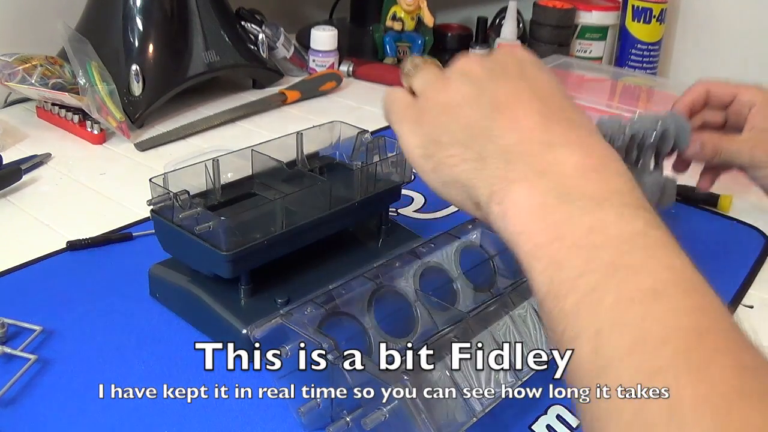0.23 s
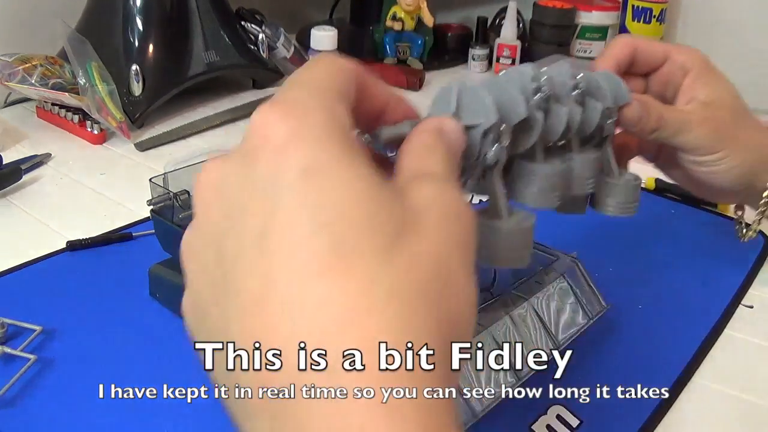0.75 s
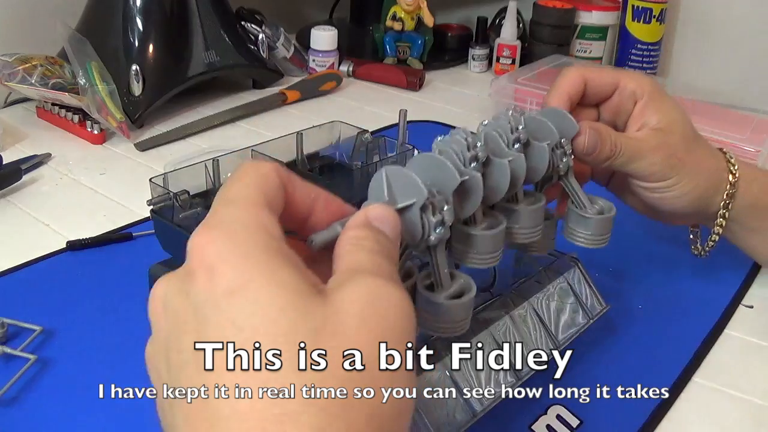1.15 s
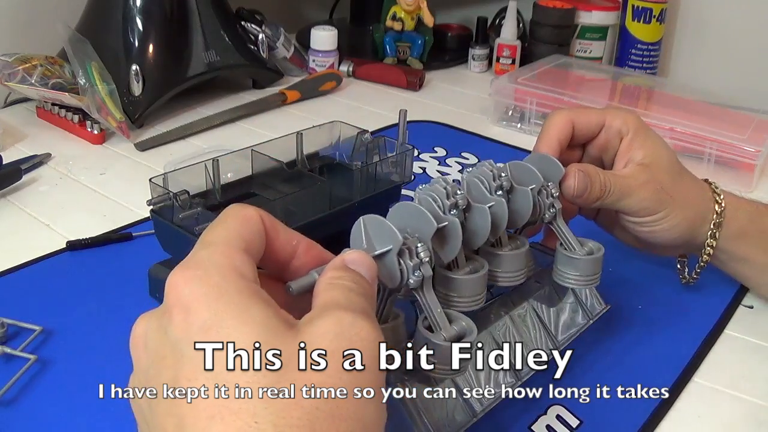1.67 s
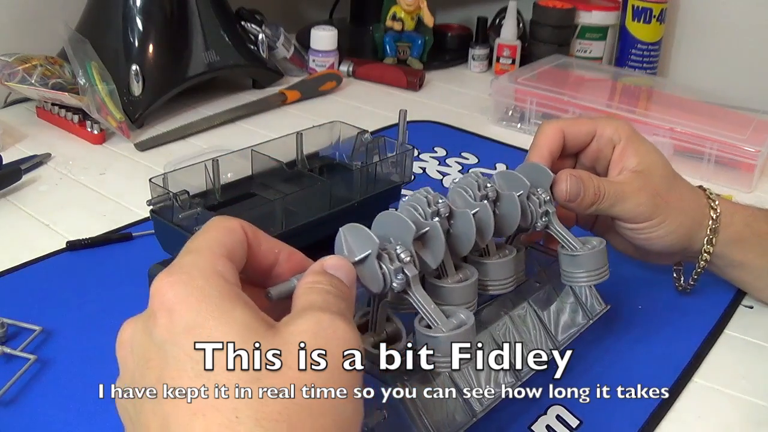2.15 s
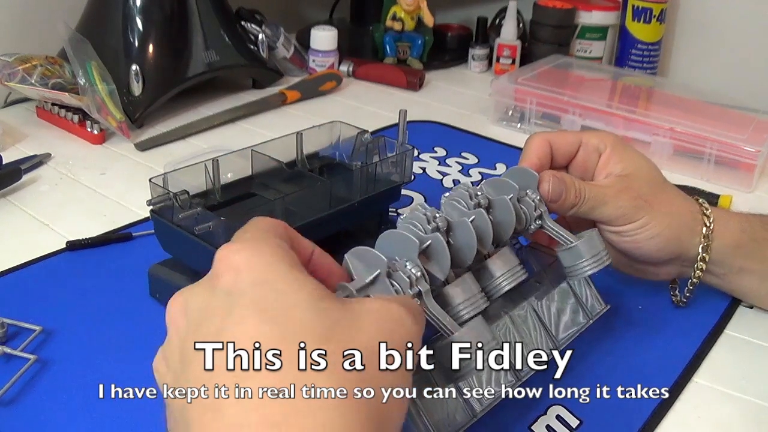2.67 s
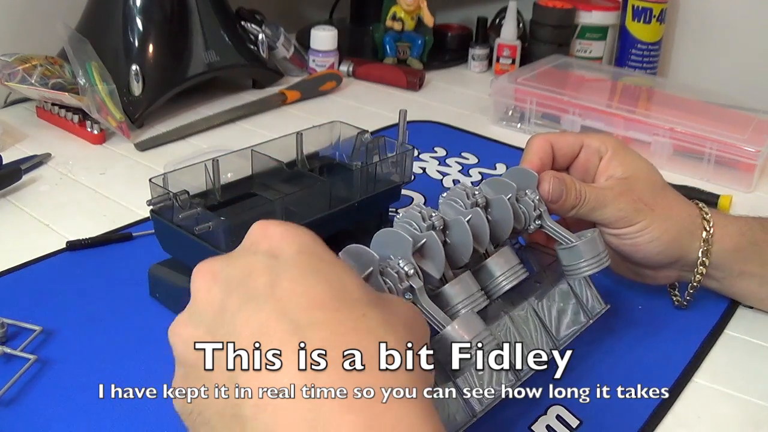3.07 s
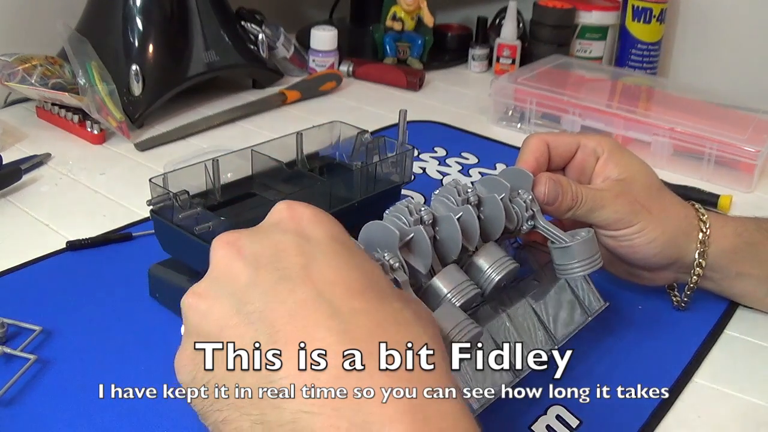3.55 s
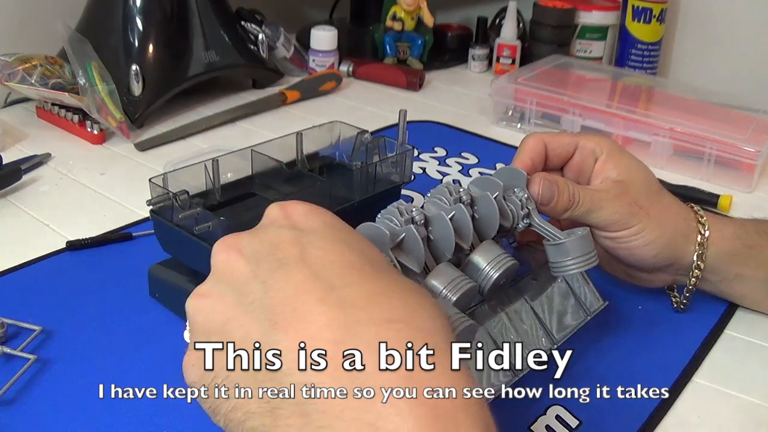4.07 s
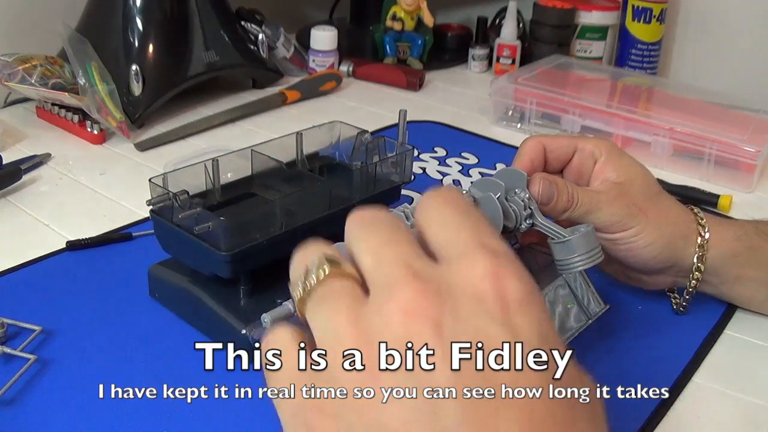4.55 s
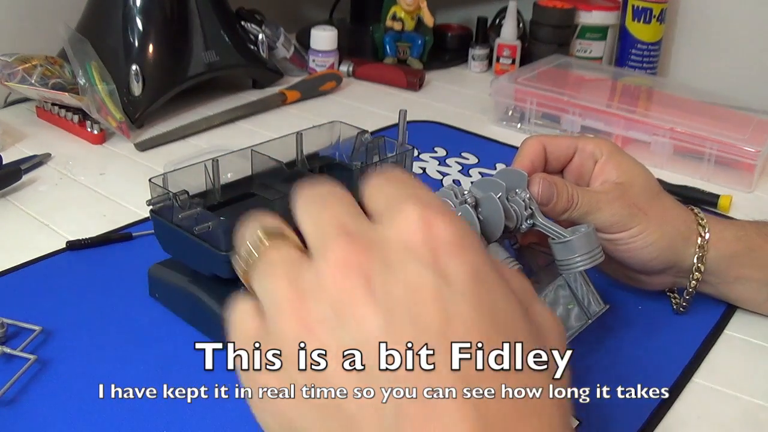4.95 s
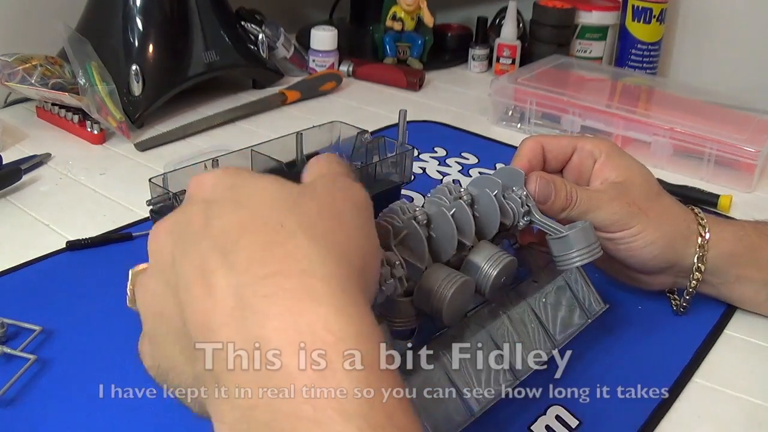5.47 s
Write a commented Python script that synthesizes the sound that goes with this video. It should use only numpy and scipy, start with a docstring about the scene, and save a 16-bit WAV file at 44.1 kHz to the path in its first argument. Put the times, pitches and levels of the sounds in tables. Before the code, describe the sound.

Small hard plastic parts clatter in a quick burst, then click, scrape and knock against a hollow plastic shell in a small quiet room.

```python
"""Crankshaft lowered into a hollow block

Hands lower a plastic crankshaft with dangling pistons into a hollow plastic engine block on a desk.
Each contact cracks, bounces, rings the small parts and knocks the block, from dying sines and noise bursts.
Sliding and rattling are clumps of tiny touches; the desk rumbles under the hands as resonant noise.
A small room answers with sparse reflections, and shaped noise makes the microphone hiss underneath.
"""
import sys
import numpy as np
from scipy import signal
from scipy.fft import rfft, irfft
from scipy.io import wavfile
from scipy.ndimage import uniform_filter1d

SR = 44100
rng = np.random.default_rng(int(sys.argv[2]) if len(sys.argv) > 2 else 0)


def dump(signal):
    """Clip the signal to [-1, 1] and save it as 16-bit WAV at the path in sys.argv[1]."""
    limited = np.clip(np.atleast_2d(signal).T, -1, 1)
    pcm = np.round(limited * 32767).astype(np.int16)
    wavfile.write(sys.argv[1], SR, pcm)


N = 252252  # length in samples

# Contacts, before left-right placement and room:
# start_s, small_parts_peak_db, block_rms_db, struck_part_pitch_hz, chatter_t60_s
CONTACTS = [(0.0421, -34.5, -81, 2760, 0.28), (0.059, -26, -77, 4200, 0.29), (0.0998, -11, -64, 7230, 0.14),
            (0.1067, -15, -71, 7240, 0.079), (0.1096, -16, -46.5, 3920, 0.19),
            (0.1237, -12.5, -51, 6100, 0.092), (0.144, -18.5, -51, 4240, 0.072),
            (0.1674, -6.5, -41.5, 7560, 0.03), (0.1732, -7.5, -45, 6960, 0.54),
            (0.1766, -11, -71, 3770, 0.22), (0.2016, -15, -64, 3410, 0.25), (0.2436, -14, -49, 7600, 0.066),
            (0.2805, -23.5, -74, 3530, 0.071), (0.383, -25, -93, 5900, 0.21),
            (0.7474, -34.5, -69, 8200, 0.099), (1.0564, -42.5, -85, 6120, 0.048),
            (1.1184, -38, -71, 5240, 0.048), (1.2192, -42.5, -71, 5520, 0.055),
            (1.3587, -41, -49, 4270, 0.036), (1.3589, -14, -33.5, 2520, 0.092),
            (1.4093, -15.5, -29, 2020, 0.17), (1.492, -16.5, -36, 4880, 0.12),
            (1.524, -22.5, -41.5, 2150, 0.1), (1.5655, -29.5, -44, 7820, 0.12),
            (1.5969, -35.5, -51.5, 2750, 0.035), (1.618, -33.5, -74, 2940, 0.073),
            (1.6464, -35, -71, 2950, 0.015), (1.6645, -43, -70, 2750, 0.047),
            (1.671, -58, -44.5, 2000, 0.037), (1.733, -47.5, -82, 2750, 0.026),
            (1.807, -46, -65, 2930, 0.03), (1.818, -37.5, -50.5, 2780, 0.054),
            (1.8442, -54, -46, 2700, 0.15), (1.8917, -48, -51, 2940, 0.06),
            (1.9496, -33.5, -35, 4000, 0.077), (1.959, -19, -36.5, 4110, 0.074),
            (1.9842, -30, -58, 3160, 0.046), (2.021, -35.5, -42, 2240, 0.12), (2.08, -37, -61, 3690, 0.13),
            (2.0912, -49, -41, 2280, 0.016), (2.1277, -32.5, -73, 3400, 0.027),
            (2.2434, -28.5, -43.5, 1996, 0.078), (2.2964, -30, -46, 3030, 0.38),
            (2.3169, -23, -28.5, 4500, 0.36), (2.3275, -17.5, -36.5, 9030, 0.05),
            (2.3836, -32, -37.5, 2100, 0.052), (2.4161, -54, -37.5, 2190, 0.055),
            (2.4665, -16.5, -23.5, 4450, 0.21), (2.4793, -7.5, -20.5, 2080, 0.095),
            (2.5038, -10.5, -20.5, 6780, 0.099), (2.526, -41, -32, 2100, 0.05),
            (2.5348, -15, -21.5, 6000, 0.024), (2.5475, -23.5, -22, 2160, 0.022),
            (2.559, -22.5, -40.5, 4420, 0.03), (2.572, -42, -52, 2100, 0.039),
            (2.589, -34, -53, 5730, 0.036), (2.615, -31.5, -59, 5400, 0.085), (2.666, -26, -44, 4180, 0.39),
            (2.682, -26.5, -35.5, 5240, 0.31), (2.698, -17.5, -35.5, 6240, 0.036),
            (2.805, -26, -35.5, 4800, 0.1), (2.818, -20.5, -36, 3250, 0.16),
            (3.096, -42.5, -56, 4100, 0.05), (3.1256, -51, -55.5, 4650, 0.24),
            (3.216, -39, -53, 3680, 0.038), (3.2381, -26.5, -44.5, 4860, 0.056),
            (3.3071, -42, -42.5, 2580, 0.11), (3.323, -41, -43, 2600, 0.24), (3.7, -45, -52.5, 3000, 0.35),
            (3.7661, -42.5, -47.5, 2250, 0.26), (4.0028, -43.5, -46.5, 2650, 0.25),
            (4.024, -30.5, -44.5, 5630, 0.096), (4.1291, -26, -34, 4450, 0.41),
            (4.1491, -9, -28, 2170, 0.067), (4.1525, -10, -61, 4280, 0.033),
            (4.2108, -26.5, -51, 5050, 0.085), (4.3002, -42.5, -47.5, 4470, 0.077),
            (4.8345, -35, -66, 6200, 0.032), (4.8406, -32.5, -54.5, 2860, 0.067),
            (4.977, -51, -51.5, 2060, 0.11), (5.0357, -33.5, -57, 2530, 0.16),
            (5.101, -31, -58, 2600, 0.068), (5.1438, -37, -51, 4360, 0.43), (5.186, -23, -42, 4700, 0.084),
            (5.2312, -43, -44, 2660, 0.1), (5.308, -48.5, -47.5, 3270, 0.15),
            (5.3709, -31, -45.5, 2720, 0.015), (5.3816, -21, -40.5, 2140, 0.028),
            (5.5776, -29.5, -65, 3110, 0.52), (5.592, -24.5, -55, 8360, 0.058),
            (5.654, -7.5, -20, 2010, 0.15), (5.6631, -11, -24.5, 5940, 0.16),
            (5.6762, -13.5, -31.5, 2150, 0.33), (5.6916, -19, -30.5, 2170, 0.17)]
# Modes of the hollow block: pitch_hz, level_db
BLOCK_MODES = [(850, -1), (980, -2), (1180, -4), (1260, -7), (1375, -7), (1435, -7.5), (1600, -8),
               (1700, -5), (1950, 0), (2170, -26.5)]
# Modes of pistons, rods and shaft: pitch_hz, t60_s
PART_MODES = [(2170, .03), (2450, .022), (2750, .022), (2950, .018), (3530, .022), (3880, .025),
              (4450, .025), (5240, .035), (5700, .028), (6100, .02), (6480, .035), (6780, .025),
              (7300, .025), (8050, .03), (8800, .02), (9600, .02)]
# Desk resonances: pitch_hz, width_hz, level_db
DESK_MODES = [(76.8, 14, -5), (136, 12.7, 0), (203.3, 18, -1), (303, 110, -5.5), (534, 530, -11)]
# Decay of the room's reflections: frequency_hz, t60_s
ROOM_DECAY = [(300, 0.18), (1400, 0.27), (4000, 0.16), (10000, 0.15)]
# Relative spectrum of the hiss: frequency_hz, density_db (per Hz)
HISS_SPECTRUM = [(15, -5.5), (25, -0.5), (181, 0), (342, -1), (732, 0), (1160, -4), (1350, -4),
                 (1970, -5.5), (10800, -11.5)]
# Left-right likeness of the hiss: frequency_hz, likeness (0 to 1)
HISS_LIKENESS = [(100, 1), (300, 0.09), (1000, 0.087), (8000, 0.48)]
# Handling: time_s, sliding_level_db, loose_part_rattle_level_db
HANDLING = [(0.0, -50.5, -50.5), (0.13, -53.5, -29), (0.25, -71, -30.5), (0.41, -62, -63.5),
            (0.94, -71.5, -64.5), (1.4, -104, -68.5), (1.531, -49.5, -52), (1.64, -63.5, -66),
            (1.86, -79, -68.5), (2.02, -50.5, -66), (2.31, -55.5, -49), (2.45, -35.5, -40),
            (2.53, -52, -29), (2.69, -41, -67), (2.869, -65, -61), (3.582, -66.5, -70.5),
            (4.031, -67.5, -68.5), (4.169, -41, -36.5), (4.38, -76, -66), (4.801, -73, -75),
            (5.24, -51.5, -61.5), (5.42, -67.5, -54), (5.62, -53, -81), (5.72, -57, -30)]
# Pitch of the spot struck on the block wall: time_s, pitch_hz
WALL_PITCH = [(5.15, 1400), (5.25, 1190), (5.45, 1190), (5.6, 1400)]

HISS_DB = -59.5  # rms before the band limit
EDGE_HZ = 11100  # top of the sound
BLOCK_T60_S = 0.048
RUMBLE_OFFSET_DB, RUMBLE_FOLLOWS = -38, 0.45  # rumble level = offset + this share of the sliding level
BOUNCES_PER_S, BOUNCE_DB = 450, -7.5  # base level of a bounce against the first touch
WALL_PITCH_SPREAD = 0.025  # standard deviation, in log pitch
SLIPS_PER_S, TICKS_PER_S = 340, 250
CLUMP_S, CLUMP_DB = 0.017, 6.5  # smoothing time and swing of the clumped touches
PLACE_DB = 1.1  # random left-right tilt, up one side and down the other


def gain_of(db):
    """Turns decibels into amplitude."""
    return 10 ** (np.asarray(db) / 20)


def read(points, hz):
    """Reads a table on a log-frequency axis."""
    f, value = np.transpose(points)
    return np.interp(np.log(hz + 1), np.log(f + 1), value)


def add(mix, s, sound):
    """Mixes a sound in at a time, cut off at the end of the scene."""
    part = mix[:, round(s * SR):][:, :sound.shape[-1]]
    part += sound[..., :part.shape[1]]


def hiss():
    """Shaped noise for room rumble and microphone hiss; likeness between channels varies with frequency."""
    hz = np.fft.rfftfreq(N, 1 / SR)
    left, other = rfft(rng.standard_normal((2, N)))
    alike = np.clip(read(HISS_LIKENESS, hz), 0, 1)
    right = alike * left + np.sqrt(1 - alike ** 2) * other
    noise = irfft(np.array([left, right]) * gain_of(read(HISS_SPECTRUM, hz)), N)
    return gain_of(HISS_DB) * noise / noise.std()


def clumps():
    """Slow random swings, limited both ways, that gather handling noise into clumps."""
    width = int(CLUMP_S * SR)
    swing = uniform_filter1d(uniform_filter1d(rng.standard_normal(N), width), width)
    return np.clip(swing / swing.std(), -1.3, 1.3)


def handling_level(column):
    """Level of one handling column in dB, gliding between its points."""
    table = np.transpose(HANDLING)
    return np.interp(np.arange(N) / SR, table[0], table[column])


def desk_rumble():
    """Fingers shake the desk: noise excites its resonances, swelling with the sliding level."""
    hz = np.fft.rfftfreq(N, 1 / SR)
    desk = sum(gain_of(db) / (1 + (2 * (hz - f) / width) ** 2) for f, width, db in DESK_MODES)
    rumble = irfft(rfft(rng.standard_normal((2, N))) * desk, N) * gain_of(2.3 * clumps())
    rumble[1] = 1.1 * rumble[0] + 0.27 * rumble[1]  # right channel mostly shares the left
    return gain_of(RUMBLE_OFFSET_DB + RUMBLE_FOLLOWS * handling_level(1)) * rumble / rumble.std()


def taps(per_s, spread_db):
    """Tiny touches at random moments, a few of them large."""
    happens = rng.random(N) < per_s / SR
    size = np.minimum(rng.exponential(1, N), 4)
    return happens * gain_of(spread_db * size) * rng.choice([-1, 1], N)


def nearness_db(modes_hz, struck_hz, slope_db, floor_db):
    """Modes near the pitch of the spot struck take most of the blow (slope per octave)."""
    return -np.minimum(slope_db * abs(np.log2(modes_hz / struck_hz)), floor_db)


def ring(hz, db, t60, t, spread_db, detune):
    """Dying sines; where the blow lands changes their strength, sign and, a little, pitch. Peak 1."""
    strength, sign, bend = rng.standard_normal((3, len(hz), 1))
    level_db = db + spread_db * strength - 60 * t / np.maximum(t60, .005)
    sines = np.sin(2 * np.pi * hz * (1 + detune * bend) * t)
    sound = (np.sign(sign) * gain_of(level_db) * sines).sum(0)
    return sound / abs(sound).max()


def band(x, lo_hz, hi_hz):
    """Band-pass, applied twice for steeper sides."""
    sos = signal.butter(2, [lo_hz, min(hi_hz, .45 * SR)], "bandpass", fs=SR, output="sos")
    return signal.sosfilt(np.vstack([sos, sos]), x)


def crack(t, t60, lo_hz, hi_hz):
    """Dying noise for the many short modes of plastic, too dense to tell apart. Peak 1."""
    sound = band(rng.standard_normal(len(t)) * gain_of(-60 * t / t60), lo_hz, hi_hz)
    return sound / abs(sound).max()


def block_slide():
    """Parts drag over the block in tiny slips, each ringing one of five spots on its wall."""
    block_hz, block_db = np.transpose(BLOCK_MODES)[:, :, None]
    t, slide = np.arange(SR // 16) / SR, np.zeros(N)
    slips = taps(SLIPS_PER_S, 2.1) * gain_of(CLUMP_DB * clumps())
    spot = rng.integers(0, 5, N)
    for k in np.unique(spot):
        modes_db = block_db + nearness_db(block_hz, WALL_PITCH[0][1], 12, 1.1)
        shell = ring(block_hz, modes_db, BLOCK_T60_S, t, 1.8, 0.03)
        shell += crack(t, 0.034, 830, 4100)
        slide += signal.oaconvolve(slips * (spot == k), shell)[:N]
    return gain_of(handling_level(1)) * slide / slide.std()


def piston_rattle():
    """Dangling pistons rattle: each random tick rings one part's mode and cracks briefly."""
    t, rattle = np.arange(SR // 16) / SR, np.zeros(N)
    ticks = taps(TICKS_PER_S, 2.4) * gain_of(CLUMP_DB * clumps())
    which = rng.integers(0, len(PART_MODES), N)
    for k, (f, t60) in enumerate(PART_MODES):
        tick = 0.48 * gain_of(-60 * t / t60) * np.sin(2 * np.pi * f * t)
        tick += crack(t, 0.025, 2200, 20000)
        rattle += signal.oaconvolve(ticks * (which == k), tick)[:N]
    return gain_of(handling_level(2)) * rattle / rattle.std()


def chatter(t60, t):
    """The first touch, then loose parts bounce at random and ever weaker."""
    happens = rng.random(len(t)) < BOUNCES_PER_S / SR
    size = np.minimum(rng.exponential(1, len(t)), 3)
    bounces = happens * gain_of(BOUNCE_DB + 3.0 * size - 60 * t / max(t60, .01))
    bounces[0] = 1
    return bounces * rng.choice([-1, 1], len(t))


def bounce(clear, cracked, t60, t):
    """Repeats a blow through chatter; the first touch gets extra clear ring, as bounces land elsewhere."""
    sound = signal.fftconvolve(chatter(t60, t), cracked)
    sound[:len(t)] += clear
    return sound


def small_parts(level_db, struck_hz, t60, t):
    """Struck pistons, rods and shaft: light taps ring clear, hard blows mostly crack."""
    part_hz, part_t60 = np.transpose(PART_MODES)[:, :, None]
    ping = ring(part_hz, nearness_db(part_hz, struck_hz, 120, 23), part_t60, t, 2.5, .004)
    ping *= gain_of(-.25 * level_db - 3)
    body = .3 * ping + crack(t, 0.012, 0.65 * struck_hz, 1.7 * struck_hz)
    # Every hard edge also ticks high, high-pitched parts most
    body += struck_hz / 9000 * crack(t, 0.012, 3440, 15900)
    meet = 1 - np.exp(-t * 2000)  # edges meet within a fraction of a millisecond
    parts = bounce(meet * ping, meet * body, t60, t)
    return gain_of(level_db) * parts / abs(parts).max()


def block_knock(s, level_db, t60, t):
    """The hollow block's modes near the struck spot knock; the shell takes a moment to fill."""
    block_hz, modes_db = np.transpose(BLOCK_MODES)[:, :, None]
    knock_hz = np.interp(s, *np.transpose(WALL_PITCH)) * np.exp(WALL_PITCH_SPREAD * rng.standard_normal())
    knock_db = modes_db + nearness_db(block_hz, knock_hz, 48, 20)
    knock = gain_of(-.15 * level_db + 4) * ring(block_hz, knock_db, BLOCK_T60_S, t, 2, .005)
    body = .4 * knock + crack(t, 0.022, 0.85 * knock_hz, 1.7 * knock_hz)
    fill = 1 - np.exp(-t / 0.0018)
    block = bounce(fill * knock, fill * body, .7 * t60, t)  # the heavy block settles sooner
    return gain_of(level_db) * block / block[:SR // 50].std()  # rms of the first 20 ms


def desk_thud(block_db, t):
    """The blow passes into the desk: its resonances ring and the mat takes a dull push."""
    hz, width, db = np.transpose(DESK_MODES)[:, :, None]
    t60 = np.log(1000) / np.pi / width  # narrower resonances ring longer
    thud = ring(hz, db, t60, t, 4.4, 0.0061) * (1 - np.exp(-t / 0.00046))
    thud += crack(t, 0.12, 220, 900)
    return gain_of(0.57 * block_db - 32.0) * thud


def contacts():
    """Every contact drives small parts and block, placed a little left or right, and the desk."""
    out, t = np.zeros((2, N)), np.arange(SR // 8) / SR
    for s, parts_db, block_db, struck_hz, t60 in CONTACTS:
        blow = small_parts(parts_db, struck_hz, t60, t) + block_knock(s, block_db, t60, t)
        tilt_db = PLACE_DB * rng.standard_normal() * np.array([[1], [-1]])
        add(out, s, blow * gain_of(tilt_db))
        add(out, s, desk_thud(block_db, t))
    return out


def tail():
    """Sparse reflections of random sign, each band dying at its own speed."""
    size = SR // 2
    reflections = np.zeros((2, size))
    slots = np.arange(150, size - 20, 20)  # one reflection per 20 samples
    at = slots + rng.integers(0, 20, (2, len(slots)))
    np.put_along_axis(reflections, at, rng.choice([-1., 1.], at.shape), 1)
    hz, t, z = signal.stft(reflections, SR, nperseg=256)
    decay = gain_of(-60 * t / read(ROOM_DECAY, hz)[:, None])
    echo = signal.istft(z * decay, SR, nperseg=256)[1]
    echo[1] = 0.57 * echo[0] + 0.63 * echo[1]  # the two capsules sit close together
    return echo / np.linalg.norm(echo, axis=1, keepdims=True)


def room(x):
    """The sound feeds two patterns of reflections in turn, by a steady 4 Hz sine and cosine."""
    turn = 2 * np.pi * 4 * np.arange(N) / SR
    shares = (np.sin(turn), np.cos(turn))
    return sum(signal.fftconvolve(share[None] * x, tail(), axes=1)[:, :N] for share in shares)


def scene():
    """Contacts, sliding and rattle with their reflections, over desk rumble and hiss."""
    handled = block_slide() + piston_rattle()
    direct = contacts() + handled
    return direct + gain_of(-6.5) * room(direct.mean(0)) + desk_rumble() + hiss()


def record(dry):
    """A steep low-pass limits the band."""
    lowpass = signal.firwin(255, EDGE_HZ, window=("kaiser", 8), fs=SR)
    return signal.oaconvolve(dry, lowpass[None], "same", axes=1)


dry = scene()
out = record(dry)
dump(out)
```